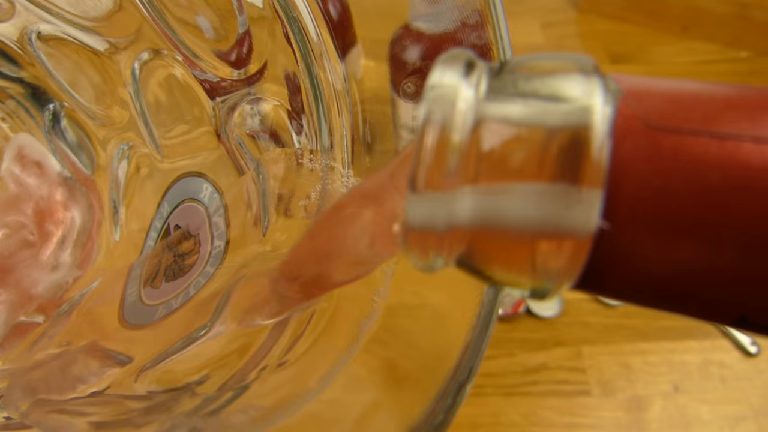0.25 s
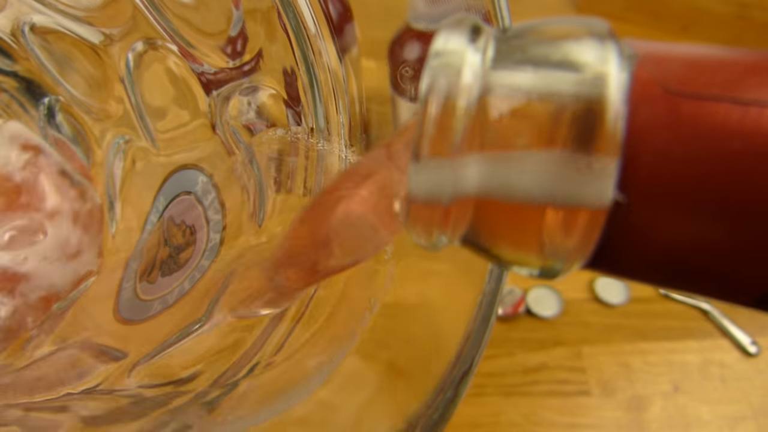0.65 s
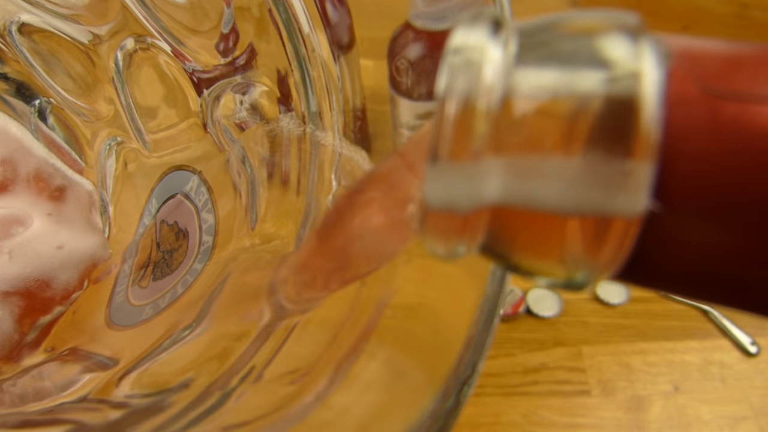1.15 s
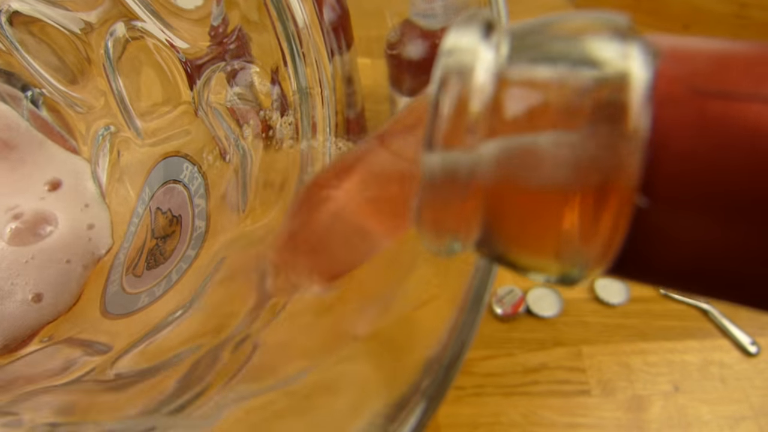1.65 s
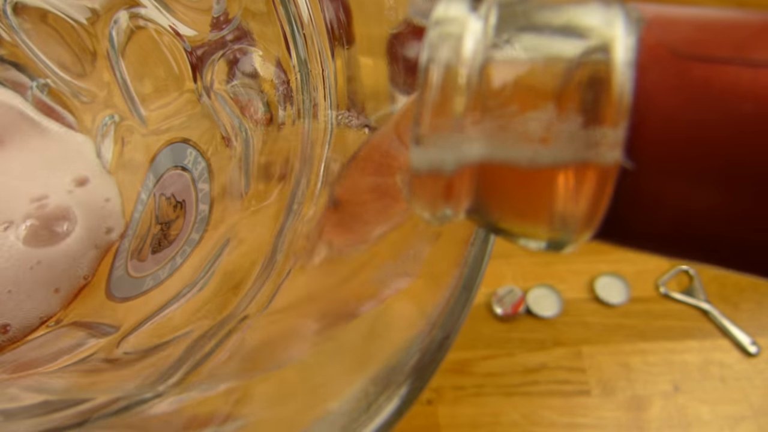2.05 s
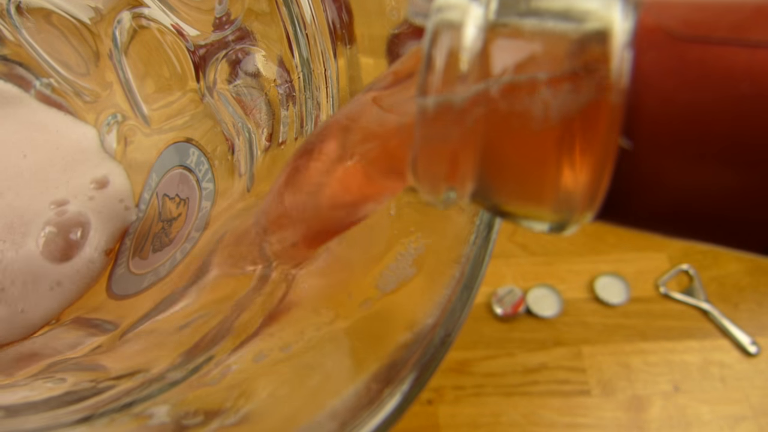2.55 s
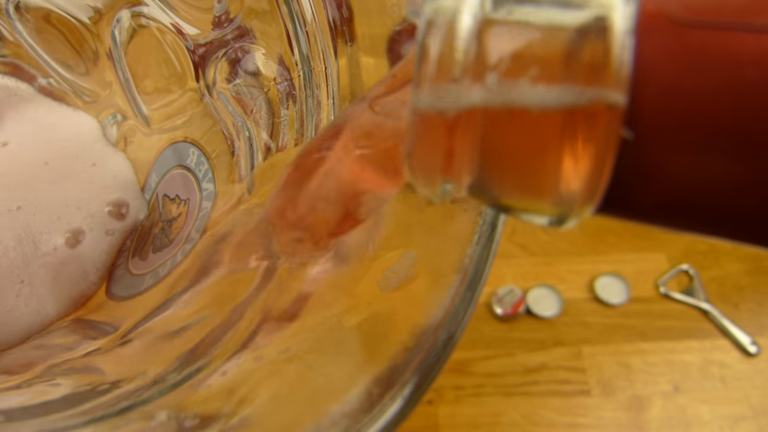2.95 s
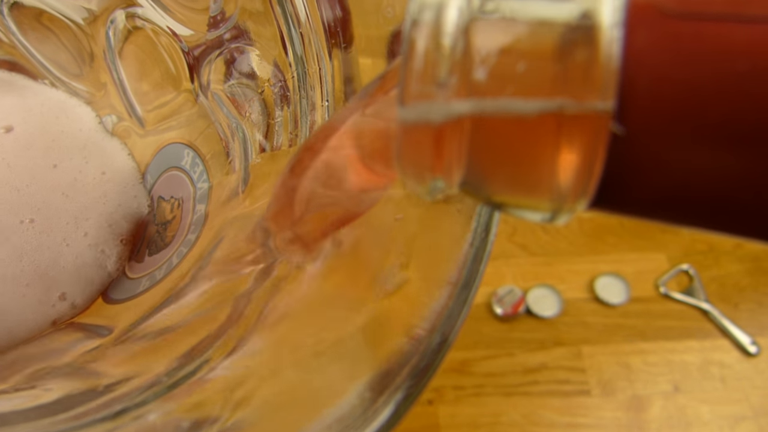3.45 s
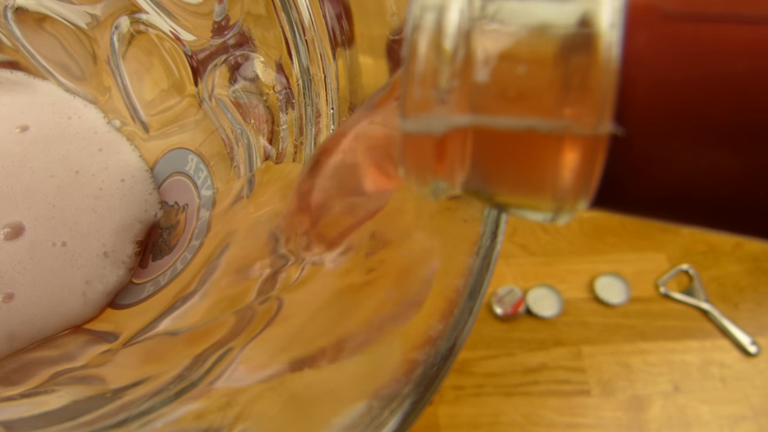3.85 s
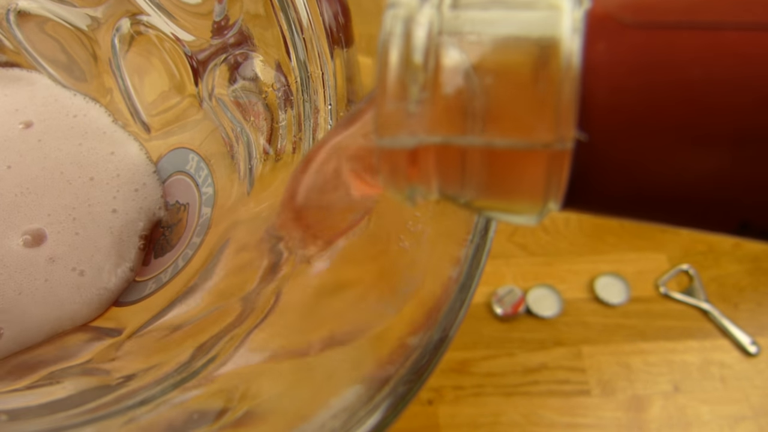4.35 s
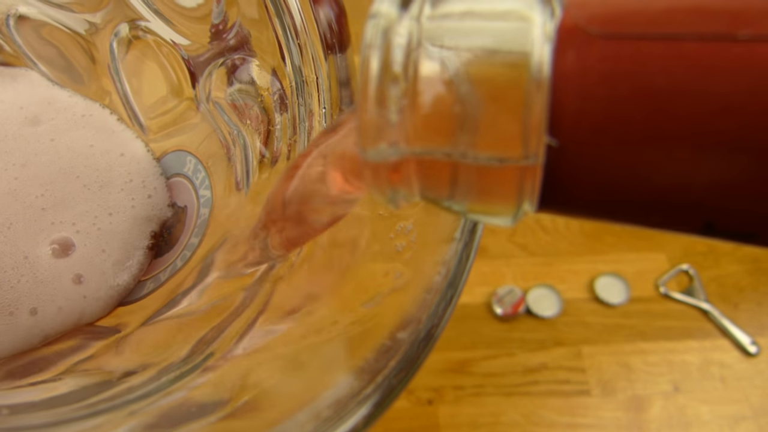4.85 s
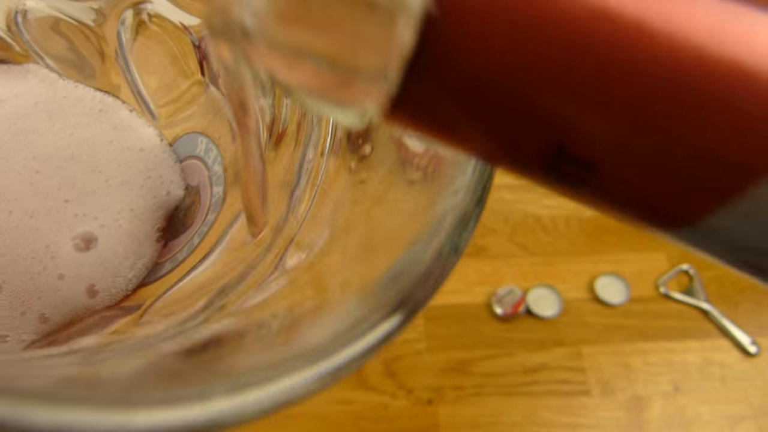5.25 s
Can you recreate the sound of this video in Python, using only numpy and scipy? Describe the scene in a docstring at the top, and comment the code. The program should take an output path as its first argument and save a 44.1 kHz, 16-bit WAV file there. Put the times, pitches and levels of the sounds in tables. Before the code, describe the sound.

Beer pours from a glass bottle into a glass mug, heard close in a small, quiet room. From the start the bottle glugs, with low rising gulps, wet plops and spitting droplets about four or five times a second. These weaken after 1 second and mostly die away by 1.6 seconds as the flow turns smooth. Meanwhile a fine fizz of foam builds, holding steady from about 1.5 seconds to the end. Around 1.8 seconds the bottle neck chatters lightly on the rim. Faint scrapes and a couple of bubble ticks follow between 2.5 and 3.1 seconds. A sharp glass clink comes at 4.4 seconds, then the loudest at 4.8, with a quick rattle and short slide. Another brief scrape leads to a duller clink at about 5.3 seconds. The mug's hollow note rises slightly as it fills.

```python
"""Beer pours from a glass bottle into a glass mug, close to a stereo microphone pair in a small room.
At first the bottle glugs: air swells into the neck, then a film bursts at the mouth with a plop and spits.
The flow turns smooth and the foam fizzes with tiny popping bubbles. The neck clinks, chatters and slides
on the rim, ringing both glasses and the air in the mug, whose note rises as it fills."""
import sys
import numpy as np
from scipy import signal
from scipy.fft import rfft, irfft
from scipy.io import wavfile
from scipy.ndimage import uniform_filter1d

SR = 44100
rng = np.random.default_rng(int(sys.argv[2]) if len(sys.argv) > 2 else 0)


def to_wav(sig):
    """Store sig (one row per channel, or 1-D mono) as 16-bit WAV at the path in sys.argv[1].

    Samples outside -1..1 are clipped; the rate is SR.
    """
    pcm = np.clip(np.atleast_2d(sig), -1, 1) * 32767
    pcm = np.round(pcm).astype(np.int16)
    wavfile.write(sys.argv[1], SR, pcm.T)  # frames by channels


N = 242550
TIME = np.arange(N) / SR
BINS = np.fft.rfftfreq(N, 1 / SR)
AGE = TIME[:SR // 2]  # seconds since the start of one short sound


def amp(db):
    """Decibels to gain."""
    return 10 ** (np.asarray(db) / 20)


def unit_rms(x):
    """Scales to rms 1."""
    return x / np.sqrt(np.mean(x ** 2) + 1e-20)


def read(spectrum, hz):
    """Reads a spectrum on a log-frequency axis."""
    f, value = np.transpose(spectrum)
    return np.interp(np.log(hz + 1), np.log(f + 1), value)


def follow(rows, t):
    """Reads each column of a curve at the times t."""
    times, *columns = np.transpose(rows)
    return [np.interp(t, times, column) for column in columns]


def add(mix, s, sound):
    """Mixes a sound in at time s."""
    part = mix[..., max(round(s * SR), 0):][..., :sound.shape[-1]]
    part += sound[..., :part.shape[-1]]


def pan(side_db):
    """Gains at the two microphones, the left louder by side_db."""
    return amp(np.array([[.5], [-.5]]) * side_db)


def low_cut(x, hz):
    """Removes the bass that a small source cannot radiate."""
    return signal.sosfilt(signal.butter(2, hz, "highpass", fs=SR, output="sos"), x)


def ring(hz, t60):
    """One dying mode."""
    return np.sin(2 * np.pi * hz * AGE) * 1000 ** (-AGE / t60)


def puff(spectrum, t60):
    """A dying puff of noise, coloured causally by a dB spectrum."""
    hz = abs(np.fft.fftfreq(len(AGE), 1 / SR))
    gain = unit_rms(amp(np.maximum(read(spectrum, hz), -80)))
    minimum_phase = np.exp(np.conj(signal.hilbert(np.log(gain))))
    noise = rng.choice([-1, 1], len(AGE)) * 1000 ** (-AGE / t60)
    return np.fft.ifft(np.fft.fft(noise) * minimum_phase).real


# The quiet of the small room: (frequency [Hz], level [dB])
ROOM_SPECTRUM = [(20, -2), (120, 0), (300, 1.5), (500, 1.5), (900, -1.5), (2000, -5.5), (16000, -24)]
def room_tone():
    """Faint, diffuse background, independent at each microphone."""
    noise = rfft(rng.standard_normal((2, N)))
    return amp(-63) * unit_rms(irfft(noise * amp(read(ROOM_SPECTRUM, BINS)), N))


# Dull body of a splash or knock, heard close: (frequency [Hz], level [dB])
THUD_SPECTRUM = [(100, -60), (250, -12), (450, -2.5), (720, 8), (950, 1.5), (1500, 1.5), (2400, -8),
                 (4000, -26), (13000, -65)]
def thud(t60):
    """A blow gives a short puff of midrange noise."""
    return puff(THUD_SPECTRUM, t60)


# Upper air modes of the mug: (frequency [Hz], width [Hz], gain [dB])
MUG_MODES = [(1214, 69, 10.5), (1957, 340, 2.5), (2870, 610, -5), (3545, 126, 4.5), (4110, 39, 2.5),
             (4833, 48, 1.5)]
def hollow():
    """Response of the mug: the direct path to the microphones plus its upper air modes."""
    return 1 + sum(amp(db) / (1 + 2j * (BINS - hz) / width) for hz, width, db in MUG_MODES)


# Films bursting at the bottle's mouth, close up: (time [s], level [dB], t60 [s])
FILM_PLOPS = [(.004, -46, .1), (.03, -42, .1), (0.1628, -21.2, .048), (.279, -35, .03),
              (0.3614, -24, 0.034), (0.5782, -23.5, 0.066), (.8092, -20.5, 0.073), (1.064, -31, 0.011),
              (1.368, -36.5, 0.053)]
def bursting_films():
    """A bursting film rings briefly with falling pitch, thumps the air in the mug and throws droplets."""
    sag_per_s, sag_pivot_hz, sag_s = 50, 1119, .03  # the further above the pivot, the faster the sag
    plops, thumps, spits, spray = np.zeros((4, N))
    for s, db, t60 in FILM_PLOPS:
        start_hz = min(1210 + 870 * s, 1780)  # successive plops start higher, up to a limit
        hz = start_hz * (sag_pivot_hz / start_hz) ** (sag_per_s * np.minimum(AGE, sag_s))
        collapse = 1 / (1 + (AGE / .028) ** 8)  # the pocket is gone in a few hundredths of a second
        add(plops, s, amp(db) * np.sin(2 * np.pi * np.cumsum(hz) / SR) * 1000 ** (-AGE / t60) * collapse)
        add(plops, s, amp(db) * low_cut(thud(t60=.013), hz=840))
        add(thumps, s, amp(db - 12) * ring(follow(FILL_NOTES, s)[0], t60=.15))
        foam_damping = 1 / (1 + (s / .5) ** 2)
        add(spits, s, foam_damping * amp(db - 15) * ring(MUG_MODES[3][0], t60=.03))
        add(spray, s, amp(-39) * 1000 ** (-AGE / .12))
    for s, db, hz in droplets():
        add(spits, s, amp(db + 8) * spit(hz))
        add(spits, s, amp(db - 8.5) * puff(POP_SPECTRUM, t60=.032))
        bare = 1 / (1 + (s / 1.2) ** 4)  # the growing head of foam cushions later droplets
        add(thumps, s, bare * amp(db - 21) * ring(follow(FILL_NOTES, s)[0], t60=.15))
        add(plops, s, bare * amp(db - 19) * thud(t60=.02))
    # a fine crackle of droplets follows every plop
    drops = rng.standard_normal(N) * (rng.random(N) < 600 / SR)
    crackle = unit_rms(irfft(rfft(drops) * amp(read(POP_SPECTRUM, BINS)), N))
    spits += amp(-8.5) * spray * crackle
    splash = irfft(rfft(amp(-4) * low_cut(plops, hz=213) + spits) * hollow(), N)
    return splash * pan(side_db=2) + low_cut(thumps, hz=154) * pan(side_db=1)


# Loud droplets and large foam bubbles snapping in the mug: (time [s], level [dB], centre [Hz])
SNAPS = [(.019, -35.5, 4000), (.0318, -27.5, 3400), (.062, -33.5, 6200), (0.2214, -32.5, 6900),
         (0.2447, -33.5, 6800), (0.2793, -29, 6000), (.4242, -39.5, 8450), (.4327, -31, 5560),
         (.464, -25, 6000), (0.6193, -33, 5600), (0.6391, -26.5, 5800), (0.8164, -25, 6300),
         (.8397, -35, 5750), (1.0565, -33, 6200), (1.0677, -29.5, 5700), (1.548, -39, 5800),
         (2.909, -35, 4500), (3.126, -36.5, 5730)]
def droplets():
    """Each plop throws a droplet, and each separate snap is followed by a smaller one."""
    for s, db, _ in FILM_PLOPS:
        yield s, db - 7, 5400
    for s, db, hz in SNAPS:
        yield s, db, hz
        yield s + .0105, db - 12, hz


def spit(hz):
    """A snap and its spray: tiny bubbles ping at scattered pitches and trail away."""
    out = np.zeros(len(AGE))
    for k, (wait, pitch, size) in enumerate(rng.random((12, 3))):
        octaves = .85 * (pitch - .5) * min(k + .61, 1.3)
        ping = ring(hz * 2 ** octaves, t60=.0055) * (1 - np.exp(-AGE * hz))
        db = -1.7 * k - 14.3 * size * min(k, 1)
        add(out, .0011 * k * (1 + .5 * wait), amp(db) * ping)
    return out


# Air pockets entering the neck, close up:
# (time of glide [s], hum before [s], fade after [s], level [dB], low pitch [Hz], top pitch [Hz])
AIR_POCKETS = [(.118, 0.11, .058, -51.5, 178, 690), (.246, .092, 0.038, -49, 180, 470),
               (.389, .034, .038, -49, 220, 420), (.568, .028, .05, -54, 96, 168),
               (.774, .022, .044, -51.5, 96, 166), (1.014, .028, .042, -50.5, 94, 172),
               (1.258, 0.023, .036, -55, 96, 168), (1.556, .033, .045, -61, 96, 165),
               (2.168, .026, .06, -56, 100, 170)]
def gulps():
    """Each air pocket hums, glides upward and fades, booming where it crosses the mug's own note."""
    glide_s, swell_s, hum_db, fade_db, overtone_db = .0135, .02, -4.5, -24, -21
    out = np.zeros(N)
    for s, lead, fade, db, low_hz, top_hz in AIR_POCKETS:
        t = np.arange(-min(lead, s), 2 * fade, 1 / SR)
        glide = 1 / (1 + np.exp(-t / glide_s))
        phase = 2 * np.pi * np.cumsum(low_hz + (top_hz - low_hz) * glide) / SR
        tone = np.sqrt(2) * (np.sin(phase) + amp(overtone_db) * np.sin(2 * phase))
        swell = np.sin(np.pi / 2 * np.minimum((t - t[0]) / swell_s, 1)) ** 2
        shape_db = hum_db * np.maximum(1 - 2 * glide, 0) + fade_db * (np.maximum(t, 0) / fade) ** 2
        add(out, s + t[0], swell * amp(db + shape_db) * tone)
    return (out + amp(13.5) * mug_air(out, width_hz=22)) * pan(side_db=-2)


# The mug fills and the bottle empties: (time [s], lowest air mode of the mug [Hz], bottle ring [Hz])
FILL_NOTES = [(0, 380, 3350), (1.0, 385, 3370), (1.9, 405, 3400), (4.412, 436, 3597), (4.85, 441, 3659),
              (5.254, 442, 3714)]
def mug_air(x, width_hz):
    """The lowest air mode of the mug resonates, rising as it fills."""
    carrier = np.exp(2j * np.pi * np.cumsum(follow(FILL_NOTES, TIME)[0]) / SR)
    pole = np.exp(-np.pi * width_hz / SR)
    return 2 * (carrier * signal.lfilter([1 - pole], [1, -pole], x / carrier + 1e-18)).real


# Tiny bubbles popping, heard close: (frequency [Hz], level [dB])
POP_SPECTRUM = [(410, -43), (700, -34.5), (995, -19), (1210, -10), (1510, -8.5), (1940, -6.5), (2650, -2.5),
                (2940, -2.5), (6180, 2), (9500, -5.5), (15800, -27)]
# How alike the foam is at the two microphones: (frequency [Hz], coherence [0-1])
FOAM_COHERENCE = [(100, .5), (1400, 0.41), (3000, 0.99), (15000, 0.86)]
# Where the foam sits between the microphones: (frequency [Hz], left minus right [dB])
FOAM_BALANCE = [(600, 11), (1400, 1), (3300, 5), (5500, -1), (8500, 5), (15000, -2.5)]
# The head building in the mug: (time [s], fine fizz [dB], coarse fizz [dB])
FIZZ_LEVELS = [(.1, -62, -69.5), (.5, -58, -62), (.75, -52, -64.5), (1.6, -48.5, -56.5),
               (2.08, -50.5, -55.5), (2.4, -49.5, -53), (2.97, -51, -56.5), (3.5, -49.5, -55),
               (4.2, -50, -54.5), (5.5, -48.5, -52)]
def foam():
    """Thousands of tiny bubbles pop each second inside the mug; coarse ones join as the head grows."""
    pops_per_s, split_hz = 7000, 4500
    sizes = amp(2.5 * np.minimum(rng.exponential(1, (3, N)), 5)) * rng.choice([-1, 1], (3, N))
    pops = rfft(sizes * (rng.random((3, N)) < pops_per_s / SR))  # shared, left only, right only
    shared = np.clip(read(FOAM_COHERENCE, BINS), 0, 1)
    pair = np.sqrt(shared) * pops[0] + np.sqrt(1 - shared) * pops[1:]
    fizz = pair * amp(read(POP_SPECTRUM, BINS)) * hollow() * pan(read(FOAM_BALANCE, BINS))
    fine_share = 1 / (1 + (split_hz / (BINS + 1)) ** 8)
    fine_db, coarse_db = follow(FIZZ_LEVELS, TIME)
    fine = amp(fine_db - .5) * unit_rms(irfft(fizz * fine_share, N))
    coarse = amp(coarse_db) * unit_rms(irfft(fizz * (1 - fine_share), N))
    flutter = unit_rms(uniform_filter1d(uniform_filter1d(rng.standard_normal(N), size=700), size=500))
    return (fine + coarse) * amp(.5 * flutter)


# The neck meeting the rim, close up:
# (time [s], glass ring [dB], brightness [Hz], thud [dB], bottle ring [dB], first rebound [s] or 0)
RIM_STRIKES = [(1.79, -64, 1510, -53, -70, 0), (1.8215, -34.5, 8000, -42, -45, .0212),
               (1.8858, -32.5, 4400, -45, -37.5, 0), (2.795, -54, 1500, -50, -68, 0.023),
               (4.412, -18.5, 4400, -36, -23, 0.0004), (4.8029, -10, 8100, -30, -29, 0),
               (4.839, -16, 4700, -32, -25.5, .017), (4.904, -32, 3800, -36, -44, 0),
               (4.933, -37, 3800, -43.5, -45, 0), (5.2538, -21, 2600, -22, -38.5, 0),
               (5.333, -51, 1500, -40.5, -70, 0)]
def contacts():
    """A loosely held neck rebounds off the rim, each time sooner, weaker and duller."""
    rebounds, restitution, step_db, softening, jitter = 4, .77, -2, .95, .02
    for s, db, bright_hz, thud_db, bottle_db, gap in RIM_STRIKES:
        for k in range(1 + rebounds * (gap > 0)):
            loss_db = k * step_db
            yield s, db + loss_db, bright_hz * softening ** k, thud_db + loss_db, bottle_db + loss_db
            s += gap * restitution ** k * (1 + jitter * rng.standard_normal())


# Modes of the glass at the microphones: (frequency [Hz], level [dB], t60 [s], left minus right [dB])
GLASS_MODES = [(1162, -14.5, 0.041, 4), (1370, -23.5, 0.047, 21), (1497, -25.5, 0.057, -18),
               (1881, -2.5, 0.04, 1.5), (1994, -12, 0.046, 11), (1858, -16, .21, 1), (1926, -21, .22, 1),
               (2351, -18, .07, 0), (3253, -21, .08, -1), (3850, -19, .09, 0), (5742, -16, .045, 0),
               (4040, -10, 0.042, 10), (4044, -11.5, 0.058, 6), (4163, -1.5, 0.029, 2.5),
               (4450, -29, .022, 1), (5040, -4, 0.016, 0), (5370, -19.5, 0.029, 2)]
def clinks():
    """Glass strikes glass: harder contacts reach higher modes, and each blow shakes the air in the mug."""
    out = np.zeros((2, N))
    modes = [(hz, (-1) ** k * amp(db) * ring(hz, t60) * pan(side_db))
             for k, (hz, db, t60, side_db) in enumerate(GLASS_MODES)]
    attack = 1 - np.exp(-AGE / .00027)
    for s, db, bright_hz, thud_db, bottle_db in contacts():
        air_hz, bottle_hz = follow(FILL_NOTES, s)
        glass = sum(mode / np.hypot(1, (hz / bright_hz) ** 3) for hz, mode in modes)
        add(out, s, amp(db) * glass * attack)
        add(out, s, amp(bottle_db) * ring(bottle_hz, t60=.11) * pan(side_db=-6))
        add(out, s, amp(thud_db + .5) * ring(air_hz, t60=.1) * pan(side_db=3.5))
        add(out, s, amp(thud_db - 14.5) * ring(MUG_MODES[0][0], t60=.06) * pan(side_db=2.5))
        add(out, s, amp(thud_db + 2.5) * thud(t60=.026) * pan(side_db=-2))
    return out


# The neck sliding on the rim, close up: (time [s], length [s], level [dB], singing relative to hum [dB])
RIM_SLIDES = [(1.814, 0.14, -47.5, -5), (2.555, 0.045, -58.5, -2), (2.789, 0.097, -56.5, -6),
              (4.836, 0.12, -41.5, 3), (5.133, .1, -47, -4)]
def slides():
    """A train of tiny slips sets the glass singing and the air in the mug humming."""
    slips_per_s = 1500
    out = np.zeros(N)
    for s, length, db, singing_db in RIM_SLIDES:
        slips = rng.standard_normal(len(AGE)) * (rng.random(len(AGE)) < slips_per_s / SR)
        slips *= np.sin(np.pi * np.minimum(AGE / length, 1))
        air_hz, bottle_hz = follow(FILL_NOTES, s)
        singing = unit_rms(ring(bottle_hz, t60=.045) + ring(GLASS_MODES[3][0], t60=.027))
        hum = unit_rms(ring(air_hz, t60=.1))
        grain = unit_rms(thud(t60=.0012))
        body = hum + amp(singing_db) * singing + amp(-8) * grain
        add(out, s, amp(db) * np.sqrt(length) * unit_rms(signal.fftconvolve(slips, body)))
    return out


# The rim as the microphone pair hears it: (frequency [Hz], phase lead of the left [rad])
RIM_PHASE = [(260, 3.25), (440, 0.19), (750, 1.62), (1200, 1.85), (1500, 2.3), (1950, 0.97), (3400, 0.42)]
def rim():
    """Clinks and slides reach the two microphones out of phase."""
    glass = low_cut(clinks() + slides(), hz=288)
    phase = np.array([[.5], [-.5]]) * read(RIM_PHASE, BINS)
    return irfft(rfft(glass) * np.exp(1j * phase), N)


# Decay of the small room around the microphones: (frequency [Hz], t60 [s])
ROOM_DECAY = [(150, 0.16), (500, 0.35), (2000, 0.29), (6000, 0.1), (14000, 0.2)]
def room(x):
    """A short diffuse tail, each band dying at its own speed."""
    hz, t, bands = signal.stft(rng.standard_normal((2, len(AGE))), SR, nperseg=256)
    tail = signal.istft(bands * 1000 ** (-t / read(ROOM_DECAY, hz)[:, None]), SR, nperseg=256)[1]
    tail *= np.minimum(TIME[:tail.shape[1]] / .0018, 1)
    return signal.fftconvolve(x, tail / np.linalg.norm(tail[0]), axes=1)[:, :N]


def scene():
    """Pour, foam and glass close to the microphones, the small room faint behind them."""
    pour = bursting_films() + gulps()
    glass = rim()
    return pour + glass + room(amp(-12) * pour + amp(-11.5) * glass) + foam() + room_tone()


def record(dry):
    """The recorder cuts off the highest treble."""
    edge_hz = 15850
    lowpass = signal.firwin(511, edge_hz, window=("kaiser", 9), fs=SR)
    return signal.oaconvolve(dry, lowpass[None], "same")


dry = scene()
out = record(dry)
to_wav(out)
```